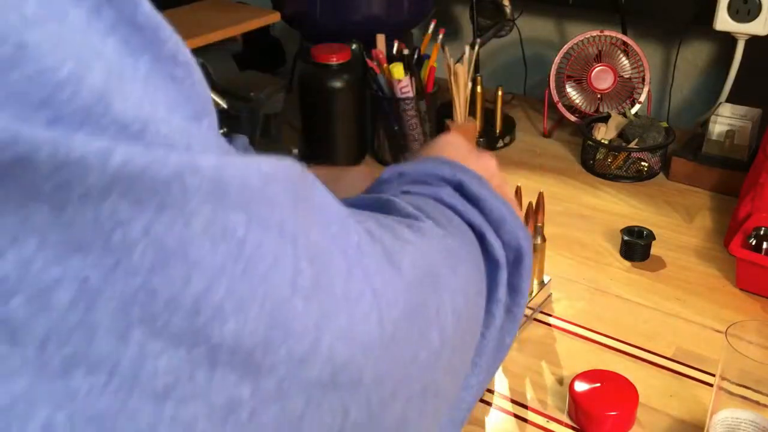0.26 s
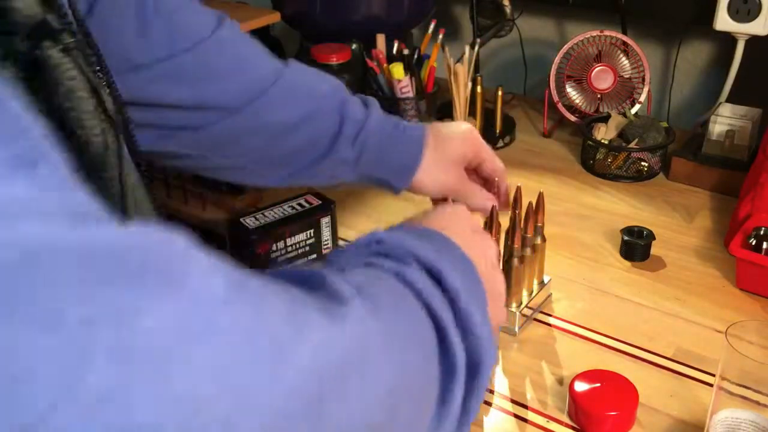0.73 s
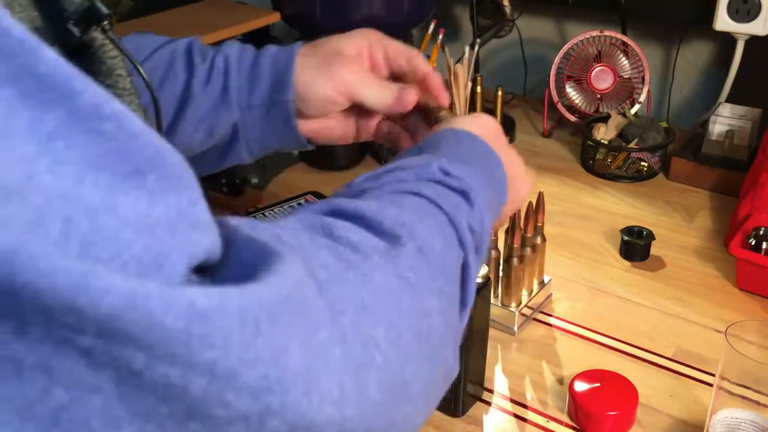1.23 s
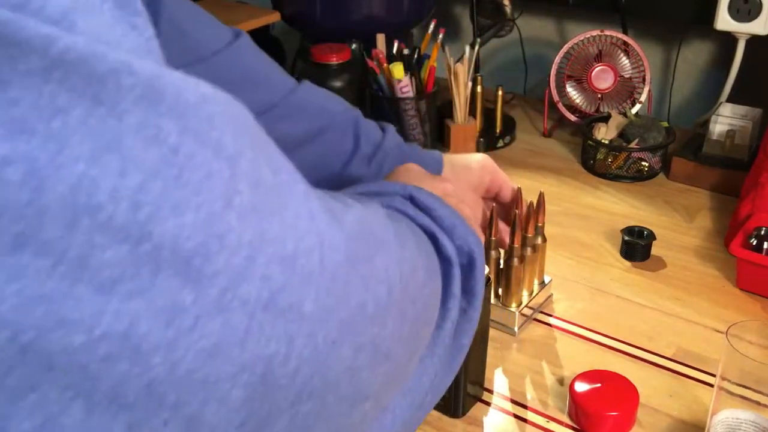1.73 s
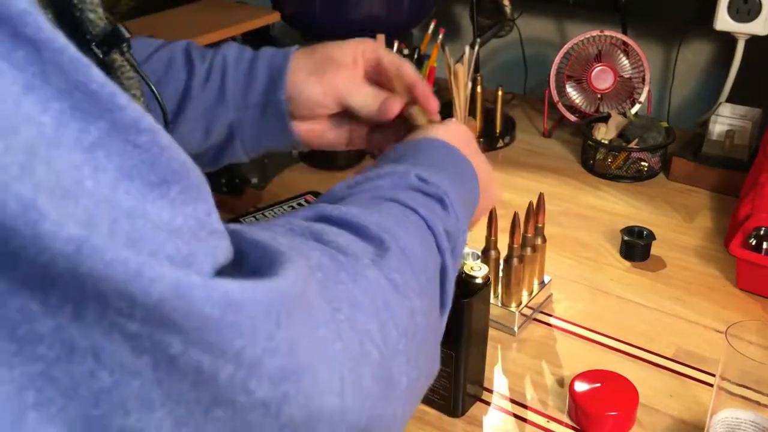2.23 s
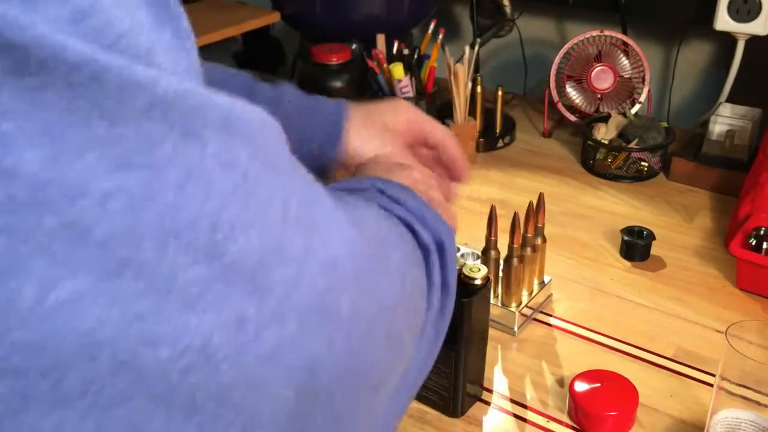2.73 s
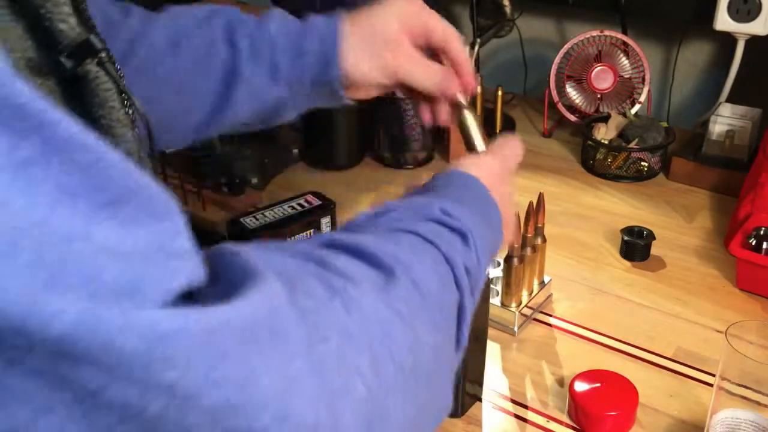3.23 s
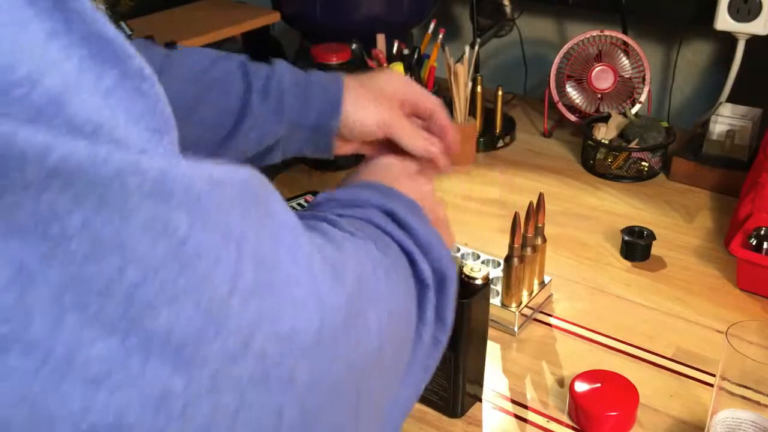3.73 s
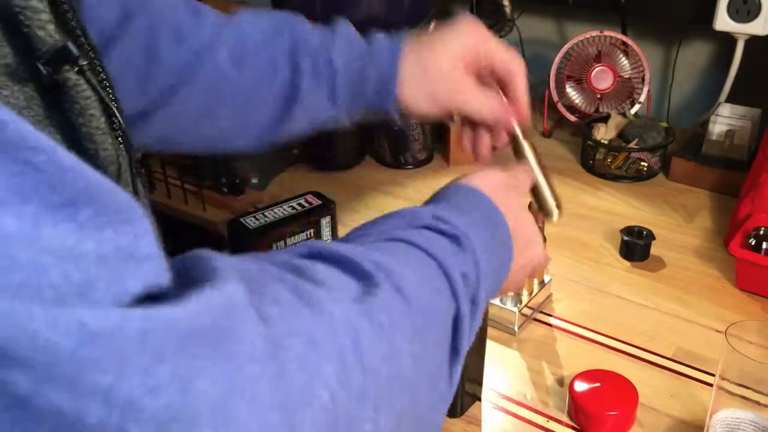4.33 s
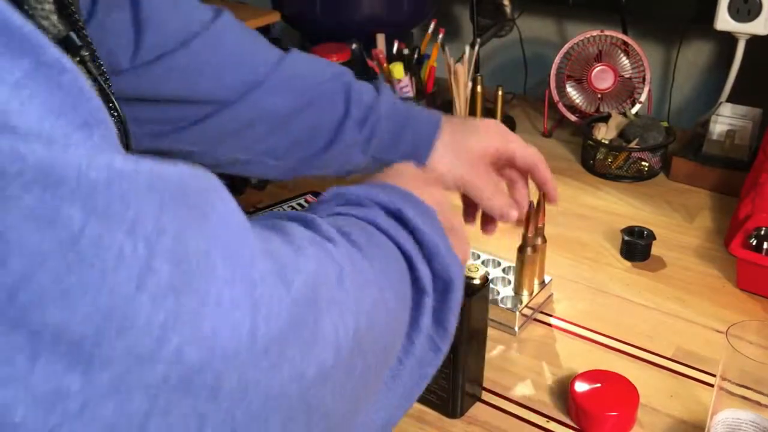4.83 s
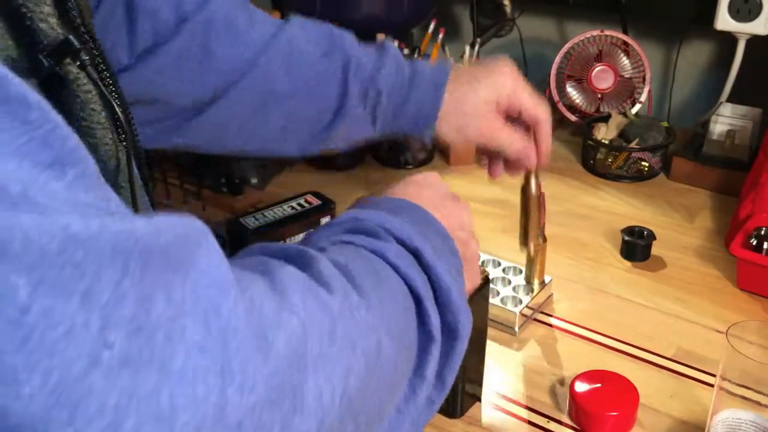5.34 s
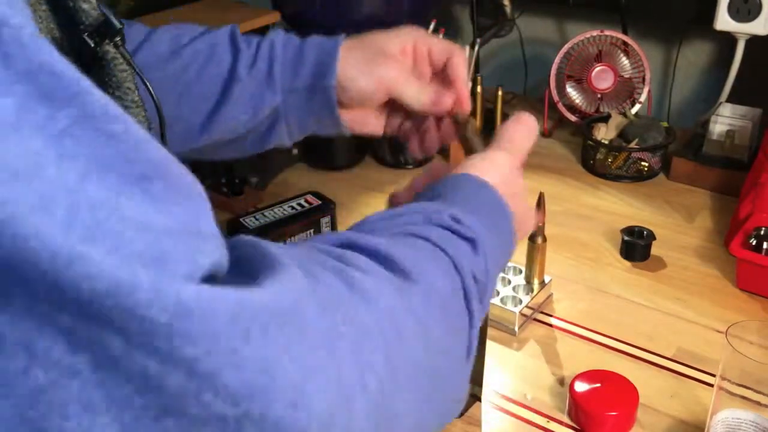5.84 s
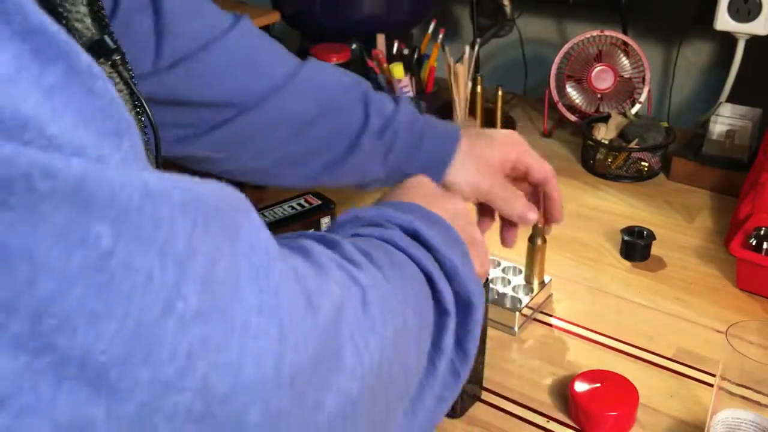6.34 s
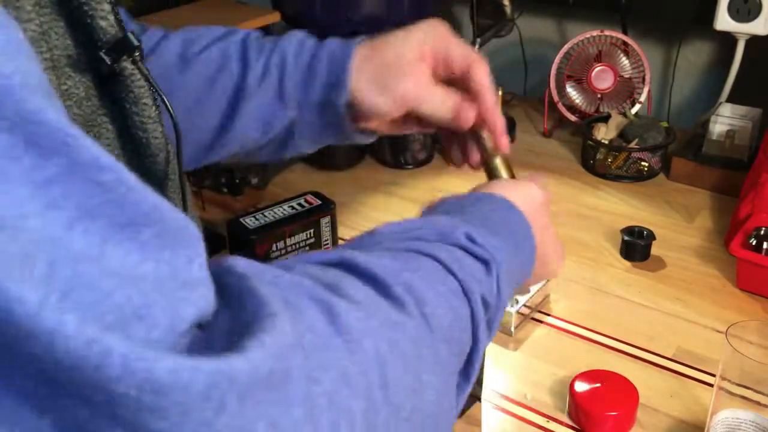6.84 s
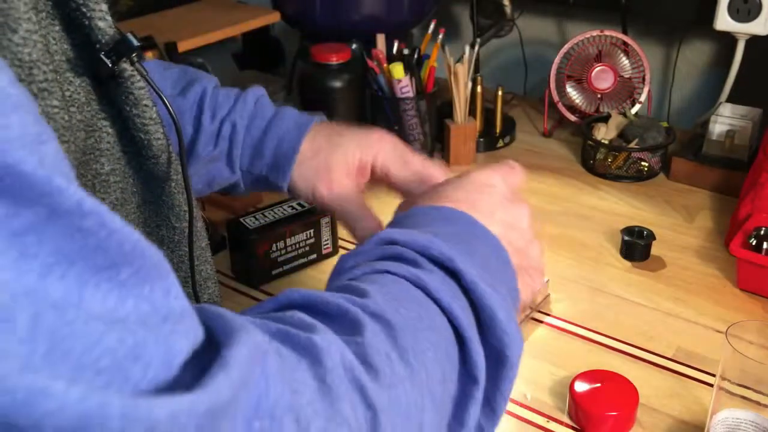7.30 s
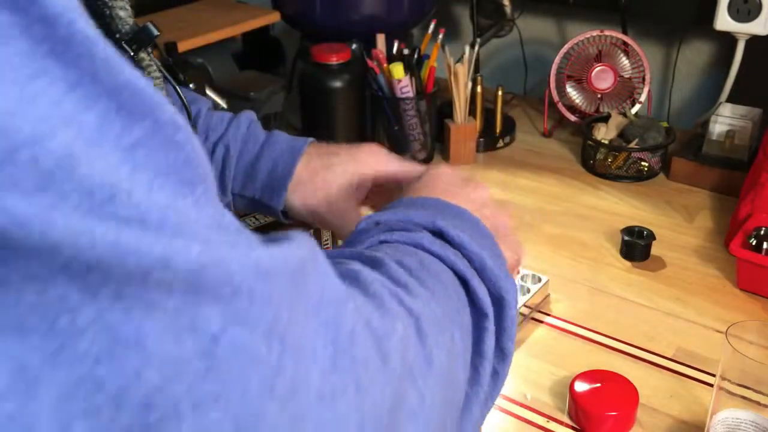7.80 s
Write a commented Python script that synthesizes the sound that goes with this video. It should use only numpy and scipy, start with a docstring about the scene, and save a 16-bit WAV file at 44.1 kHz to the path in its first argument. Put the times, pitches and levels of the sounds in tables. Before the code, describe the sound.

Brass rifle cartridges are loaded one by one into a metal holder on a wooden bench, heard close in a small room with faint electrical hum. A sleeve rustles and brass clinks, then a loud clatter of hollow, briefly ringing knocks comes at 0.6 seconds. Light clinks and dull finger bumps follow around 1 second. More cartridges knock home at 1.9, 2.9 and 4 seconds, each preceded by small taps or clinks; the one at 2.9 is loudest and briefly overloads the microphone. Short scrapes, soft sleeve rubs and a few low puffs of air fall in between. Lighter taps and bumps come around 5 seconds, then further clatters at 5.7, 6.3 and 6.5. From 7.2 seconds a cartridge is lined up with quick taps, chinks and scrapes over rustling cloth, before the last sharp knocks at about 7.9 to 8 seconds.

```python
"""Loading rifle cartridges into a metal block

Cartridges are lifted from a tray and pressed one by one into a block on a wooden bench. Each goes in
with a clatter of knocks that ring the block and its walls; the brass cases clink and sing when handled.
Hands bump and a sleeve rustles in a small room with faint mains hum. Loud knocks overload the mic."""
import sys
import numpy as np
from scipy import signal
from scipy.fft import rfft, irfft, next_fast_len
from scipy.io import wavfile
from scipy.ndimage import uniform_filter1d

SR = 44100
rng = np.random.default_rng(int(sys.argv[2]) if len(sys.argv) > 2 else 0)


def bounce(signal):
    """Save signal as a 16-bit WAV file at the path given by the first command-line argument."""
    frames = np.transpose(np.atleast_2d(signal))
    limited = np.clip(frames, -1, 1)
    pcm = np.round(limited * 32767).astype(np.int16)
    wavfile.write(sys.argv[1], SR, pcm)


N = 355710
AGE_S = np.arange(SR // 3) / SR  # time since a contact

# Noise spectra. Each row: frequency in Hz, relative density in dB.
AIR_SPECTRUM = [(100, -8), (280, -13.5), (460, -16), (680, -16), (1000, -26), (5800, -34), (16000, -42)]
RUMBLE_SPECTRUM = [(5, -1.5), (15, 7.5), (30, -11), (50, -14), (80, -27), (150, -39), (400, -72.5)]
CLOTH_SPECTRUM = [(100, 1), (300, 9.5), (800, 8), (1500, 2), (3500, -1.5), (7000, -15.5), (10000, -26),
                  (16000, -26.5)]
THUD_SPECTRUM = [(40, -15.5), (110, -8), (200, -3.5), (290, 3.5), (450, 3), (650, 1), (900, -4),
                 (6000, -71.5)]
SCUFF_SPECTRUM = [(400, 15.5), (900, 9.5), (1800, 9), (3500, 0.5), (5000, -9.5), (8000, -42), (16000, -103)]
CHINK_SPECTRUM = [(1400, -21.5), (2400, -2), (3150, 7), (3900, -4), (5500, -6.5), (7000, -12.5),
                  (8300, -16), (9800, -26.5), (16000, -33.5)]
WALL_SPECTRUM = [(300, -23.5), (650, -4), (900, 4), (1300, -7), (2000, -7), (2500, -20.5), (12000, -61.5)]
CRACK_SPECTRUM = [(1200, -20), (2400, 1), (3200, 3.5), (4500, -2), (7200, -8), (8300, -14.5),
                  (11000, -20.5), (16000, -33.5)]
TICK_SPECTRUM = [(60, 28.0), (1000, -6.5), (4000, -1), (12000, -30), (16000, -23)]
# Mains hum. Each row: frequency in Hz, rms level in dB.
HUM_PARTIALS = [(120, -57), (360, -66), (600, -67.5), (720, -74.5)]
# Room decay. Each row: frequency in Hz, T60 in seconds.
ROOM_DECAY = [(100, 0.61), (500, 0.27), (1500, 0.31), (4000, 0.25), (7000, 0.3), (10000, 0.08),
              (16000, 0.2)]
# Modes. Each row: frequency in Hz, relative level in dB, T60 in seconds.
BLOCK_MODES = [(277, -27, 0.23), (394, -18, 0.11), (519, -10.5, 0.048), (574.6, -8.5, 0.17),
               (669, -13.5, 0.25), (762, -10.5, 0.061)]
WALL_MODES = [(824, -0.5, 0.12), (930, -8.5, 0.17), (1080, -8, 0.2), (1097, -5, 0.14), (1283, 2, 0.072),
              (1350, -7, 0.091), (1662, -13.5, 0.15), (1697, -3.5, 0.11), (1932, 1.5, 0.08),
              (2104, 2.5, 0.063)]
HELD_CASE_MODES = [(2350, -2.5, .1), (2880, -1.5, 0.089), (3310, -3.5, 0.069), (3920, -8.5, 0.052),
                   (4720, -4.5, 0.056), (5460, -15.5, 0.16), (6300, -6.5, 0.082), (6950, -8.5, 0.097),
                   (7410, -11, 0.15), (9000, -13.5, .07)]
HANGING_CASE_MODES = [(3030, 10, 0.035), (4350, -7, 0.028), (4460, 8.5, 0.046), (6550, -6, 0.044),
                      (6320, -0.5, 0.0363), (9470, -10, 0.16), (10350, -1.5, 0.23), (13160, -11, .14),
                      (13600, -7, .14), (15300, -8, .13)]

# Sleeve rubs. Each row: midpoint in seconds, length in seconds, level in dB.
STROKES = [(0.275, 0.023, -40), (0.338, 0.16, -45), (1.393, 0.67, -61.5), (3.21, 0.15, -45.5),
           (4.335, 0.053, -37.5), (5.34, 0.56, -54.5), (7.8, 0.47, -45)]
# Air pushed by passing arms. Each row: midpoint in seconds, peak in dB.
PUFFS = [(1.272, -30.5), (2.285, -23.5), (3.413, -17.5), (4.548, -29.5)]
# Ticks at the mic. Each row: start in seconds, level in dB.
TICKS = [(2.279, -40.5), (3.36, -30.5), (4.543, -44.5)]
# Fingers on tray and block. Each row: start in seconds, thud in dB, scuff in dB.
BUMPS = [(0.888, -40, -37.5), (0.912, -27.5, -32), (0.951, -24, -39), (1.032, -34, -24),
         (1.108, -31.5, -29.5), (2.002, -51.5, -31.5), (3.07, -53, -32.5), (3.086, -31.5, -40),
         (3.153, -35.5, -33.5), (3.238, -37, -34), (4.237, -29, -34), (5.066, -28.5, -27),
         (5.219, -45.5, -44), (5.294, -36, -43), (5.32, -31.5, -38), (6.591, -26.5, -36)]
# Lining up a cartridge. Each row: start in seconds, length in seconds, base level in dB.
FUMBLES = [(5.015, .03, -35.5), (7.207, .075, -43), (7.332, .04, -46), (7.527, .05, -42.5),
           (7.752, .04, -37)]
# Bullet tip on a wall. Each row: start in seconds, level in dB, block response in dB.
TAPS = [(0.16, -49, -54), (0.26, -49, -44), (0.974, -29.5, -45), (1.801, -25, -23), (2.77, -34, -25),
        (4.09, -36, -31), (4.981, -31.5, -33.5), (4.997, -32.5, -27), (5.05, -37, -29.5),
        (5.586, -35, -38.5), (5.606, -31, -36), (6.404, -31.5, -25), (7.203, -25, -38.5),
        (7.391, -38.5, -47), (7.418, -30, -26), (7.442, -34, -31.5), (7.463, -41, -51), (7.661, -29.5, -29),
        (7.739, -25, -33), (7.844, -27, -29.5)]
# Case dragged on the block. Each row: start in seconds, length in seconds, level in dB.
SCRAPES = [(0.443, 0.055, -47), (1.907, 0.13, -39.5), (6.384, 0.15, -45), (7.588, 0.068, -47.5),
           (7.718, 0.068, -41.5)]
# Case along the tray. Each row: start and length in seconds, then low, middle and high modes in dB.
SLIDES = [(1.998, .035, -40, -43, -66), (3.173, .033, -45, -52.5, -63), (4.323, 0.032, -50.5, -46.5, -57),
          (5.303, 0.017, -48.5, -44.5, -76), (5.375, 0.021, -50, -52, -74), (6.6, 0.062, -37, -49.5, -71)]
# Rim past an edge. Each row: start in seconds, level in dB, resonance in Hz.
SNAPS = [(0.447, -37, 6650), (.643, -22, 4450), (1.003, -34.5, 7150), (1.031, -36.5, 11100),
         (1.102, -43, 7100), (3.219, -31.5, 5430), (3.217, -41, 10400), (3.989, -29.5, 6600),
         (4.003, -28.5, 6250), (6.2717, -30, 5800), (7.918, -27, 7000)]
# Brass on brass. Each row: start in seconds, level in dB, block response in dB, main ring in Hz.
CLINKS = [(0.435, -35, -23, 3110), (0.448, -32.5, -29, 3160), (0.485, -33, -32, 3120),
          (0.493, -30, -49.5, 3160), (1.003, -31, -49, 3410), (1.034, -25, -49, 3090),
          (1.102, -28.5, -48, 3070), (1.653, -37.5, -45, 3110), (1.667, -38.5, -43, 3130),
          (2.67, -30.5, -28, 7500), (2.689, -29, -24.5, 7400), (3.218, -30, -41, 5500),
          (5.45, -41, -45.5, 3060), (6.433, -29.5, -26.5, 2914), (7.261, -35, -39, 2945),
          (7.752, -27, -29, 3560)]
# Cartridge catching at the block's mouth, then seating. Each row: start in seconds, strength in dB,
# hardness in dB (high edge-on, low flat), centre of the wall ring in Hz.
KNOCKS = [(0.549, -22.5, 1.5, 1120), (0.6137, -12, -7.5, 1140), (0.6164, -16.5, 10, 1280),
          (0.635, -5.5, -29, 1110), (0.643, -1.5, -7, 1030), (1.774, -20.5, -5.5, 905),
          (1.864, -10.5, -3.5, 1130), (1.872, -9, -2, 1130), (1.879, -7, -7, 1060),
          (1.898, -3.5, -2.5, 960), (2.846, -23.5, 10.5, 920), (2.8504, -1, -7.5, 1020),
          (2.866, 5.5, -11.5, 1200), (2.888, -13.5, -1, 1200), (3.846, -22.5, 0, 1100),
          (3.967, -19.5, 1, 980), (3.981, -10.5, 0, 1170), (3.999, -4.5, -4, 1148), (5.074, -21, -3, 1180),
          (5.642, -15, -2.5, 890), (5.654, -12, -1.5, 990), (5.667, -14, -7, 885), (5.682, -5, -6, 1360),
          (6.258, -8.5, -5, 944), (6.456, -19.5, -2.5, 965), (6.485, -12, -3, 1090),
          (7.886, -11.5, -1, 1380), (7.907, -6.5, -8, 1400), (7.918, -6.5, -6.5, 1450),
          (7.997, -7.5, -3, 1310)]

GRAIN_DB, SCRAPE_T60_S = 5.5, 0.08
EMPTY_HZ, FULL_HZ, FILL_TAU_S = 684, 549, 3.2  # the block's note sinks as it fills
CRACK_DB, CRACK_DB_PER_DB = -9, 1.257  # the crack grows faster than the ring
REBOUND_GAP_S, REBOUND_DB, REBOUND_CRACK_DB = 0.007, -11.5, 6.5  # per rebound


def amp(db):
    """Decibels to gain."""
    return 10 ** (np.asarray(db) / 20)


def unit_rms(x):
    """Scale to rms 1."""
    return x / np.sqrt(np.mean(x ** 2) + 1e-20)


def unit_attack(x):
    """Scale to rms 1 over the first 8 ms."""
    return x / np.sqrt(np.mean(x[:353] ** 2) + 1e-20)


def log_interp(points, hz):
    """Read a table on a log-frequency axis."""
    points_hz, values = np.transpose(points)
    return np.interp(np.log(hz + 1), np.log(points_hz + 1), values)


def add(mix, start_s, sound):
    """Mix a sound in, in place."""
    part = mix[round(start_s * SR):][:len(sound)]
    part += sound[:len(part)]


def colour(x, spectrum):
    """Minimum-phase filter with the given spectrum."""
    size = next_fast_len(len(x) + 4096)
    log_gain = np.log(amp(log_interp(spectrum, abs(np.fft.fftfreq(size, 1 / SR)))))
    response = np.exp(np.conj(signal.hilbert(log_gain)))[:size // 2 + 1]
    return irfft(rfft(x, size) * response, size)[:len(x)]


def decay(t60_s):
    """Exponential envelope."""
    return amp(-60 * AGE_S / t60_s)


def grit():
    """Micro-impacts of uneven size."""
    noise, grain = rng.standard_normal((2, len(AGE_S)))
    return noise * amp(GRAIN_DB * np.clip(grain, -2, 2))


def burst(spectrum, t60_s, scrape_db=-np.inf):
    """A contact: dense micro-impacts, then a scrape if the metal slides on."""
    envelope = decay(t60_s) + amp(scrape_db) * decay(SCRAPE_T60_S)
    return unit_attack(colour(grit() * envelope, spectrum))


def ring(modes, scatter_db, detune):
    """Decaying modes; contact point and grip vary their levels and pitches."""
    hz, db, t60_s = np.transpose(modes)[:, :, None]
    strength, shift, side = rng.standard_normal((3, len(modes), 1))
    waves = np.sign(side) * np.sin(2 * np.pi * hz * (1 + detune * shift) * AGE_S)
    return unit_attack((amp(db + scatter_db * strength) * decay(t60_s) * waves).sum(0))


def friction(response, length_s):
    """A stream of micro-impacts drives a body, which rings on."""
    contact = np.clip(np.minimum(AGE_S, length_s - AGE_S) / 0.0051, 0, 1)
    sound = signal.fftconvolve(grit() * contact, response)[:len(AGE_S)]
    return sound / np.sqrt(np.sum(sound ** 2) / (SR * length_s))


def background():
    """Room air, mains hum, and a lumpy rumble of moving air and bench."""
    t = np.arange(N) / SR
    air_noise, rumble_noise, lumps = rng.standard_normal((3, N))
    swell = amp(3.5 * unit_rms(uniform_filter1d(lumps, size=9000)))
    air = unit_rms(colour(air_noise, AIR_SPECTRUM))
    rumble = unit_rms(colour(rumble_noise * swell, RUMBLE_SPECTRUM))
    hum = sum(amp(db) * np.sqrt(2) * np.sin(2 * np.pi * (hz * t + rng.random()))
              for hz, db in HUM_PARTIALS)
    return amp(-57) * air + amp(-38.5) * rumble + hum


def room(x, wet_db):
    """Add sparse reflections, each band decaying at its own rate."""
    echoes = rng.choice([-1., 1.], SR // 2) * (rng.random(SR // 2) < 0.12)
    echoes[:SR // 200] = 0  # 5 ms pre-delay
    hz, t, bands = signal.stft(echoes, SR, nperseg=256)
    bands = bands * amp(-60 * t / log_interp(ROOM_DECAY, hz)[:, None])
    tail = signal.istft(bands, SR, nperseg=256)[1]
    return x + amp(wet_db) * signal.fftconvolve(x, tail / np.linalg.norm(tail))[:N]


def sleeve():
    """Fleece rubbing: grainy noise swells with each stroke; puffs of air dip the pressure."""
    t = np.arange(N) / SR
    noise, grain = rng.standard_normal((2, N))
    catches = amp(1.5 * unit_rms(uniform_filter1d(grain, size=300)))
    speed = sum(amp(db) * np.exp(-(2 * (t - mid_s) / length_s) ** 2) for mid_s, length_s, db in STROKES)
    puffs = sum(amp(db) * np.exp(-((t - mid_s) / 0.009) ** 2) for mid_s, db in PUFFS)
    return speed * unit_rms(colour(noise * catches, CLOTH_SPECTRUM)) - puffs


def ticks():
    """Tiny snaps, too close to carry any room."""
    out = np.zeros(N)
    for start_s, db in TICKS:
        add(out, start_s, amp(db) * burst(TICK_SPECTRUM, t60_s=0.0084))
    return out


def finger_bumps():
    """Soft fingers give a dull thud and a scuff."""
    out = np.zeros(N)
    for start_s, thud_db, scuff_db in BUMPS:
        add(out, start_s, amp(thud_db) * burst(THUD_SPECTRUM, t60_s=0.17))
        add(out, start_s, amp(scuff_db) * burst(SCUFF_SPECTRUM, t60_s=0.12))
    return out


def walls(centre_hz, width_oct, noise_db):
    """The thin walls ring most near centre_hz, set by where they are hit."""
    def focus_db(hz):
        return -3 * (np.log2(hz / centre_hz) / width_oct) ** 2
    modes = [(hz, db + focus_db(hz), t60_s) for hz, db, t60_s in WALL_MODES]
    spectrum = [(hz, db + focus_db(hz)) for hz, db in WALL_SPECTRUM]
    tones = ring(modes, scatter_db=4.5, detune=0.012)
    return unit_attack(tones + amp(noise_db) * burst(spectrum, t60_s=0.019, scrape_db=-8))


def touched_block():
    """The block's damped response to a light contact."""
    body = unit_attack(ring(BLOCK_MODES, scatter_db=4, detune=0.035) * decay(0.13))
    return body + amp(-8.5) * walls(centre_hz=798, width_oct=0.34, noise_db=-1.5)


def touched_wall():
    """A light contact briefly stirs the upper wall modes."""
    return walls(centre_hz=1620, width_oct=0.55, noise_db=5) * decay(0.098)


def chink(scrape_db=-13):
    """Bright click of brass, without its ring."""
    return burst(CHINK_SPECTRUM, t60_s=0.018, scrape_db=scrape_db)


def fumbles(gap_s=0.014, spread_db=8):
    """Small chinks at uneven gaps while a cartridge is lined up."""
    out = np.zeros(N)
    for start_s, length_s, db in FUMBLES:
        for k, (jitter, size) in enumerate(rng.random(size=(12, 2))):
            delay_s = (k + jitter) * gap_s
            contact = chink() + amp(5.5) * touched_wall()
            if delay_s < length_s:
                add(out, start_s + delay_s, amp(db + spread_db * (2 * size - 2.5)) * contact)
    return out


def tip_taps():
    """A bullet tip on a wall: a short knock and a chink."""
    out = np.zeros(N)
    for start_s, db, block_db in TAPS:
        tap = touched_wall() + amp(-9.5) * chink()
        add(out, start_s, amp(db) * tap + amp(block_db) * touched_block())
    return out


def block_scrapes():
    """Dragged brass stirs the block's main notes, upper wall modes and lower case modes."""
    out = np.zeros(N)
    modes = BLOCK_MODES[3:5] + WALL_MODES[6:] + HELD_CASE_MODES[:4]
    for start_s, length_s, db in SCRAPES:
        body = ring(modes, scatter_db=3.5, detune=0.016) * decay(0.08)
        add(out, start_s, amp(db) * friction(body, length_s))
    return out


def tray_slides():
    """The rim rasps on the tray and the hanging case sings; fingers damp its modes unevenly."""
    out = np.zeros(N)
    groups = HANGING_CASE_MODES[:1], HANGING_CASE_MODES[1:5], HANGING_CASE_MODES[5:]
    for start_s, length_s, low_db, mid_db, high_db in SLIDES:
        for modes, db in zip(groups, (low_db, mid_db, high_db)):
            case = ring(modes, scatter_db=6, detune=0.0009)
            add(out, start_s, amp(db) * friction(case, length_s))
        rasp = friction(burst(CHINK_SPECTRUM, t60_s=0.0011), length_s)
        add(out, start_s, amp(mid_db + 1.5) * rasp)
    return out


def rim_snaps(q=4.8):
    """A rim slips past an edge: a short, bright contact with one broad resonance."""
    out = np.zeros(N)
    grid_hz = np.geomspace(100, SR / 2, 120)
    for start_s, db, hz in SNAPS:
        band_db = -20 * np.log10(1 + (q * (grid_hz / hz - hz / grid_hz)) ** 2)
        spectrum = np.column_stack([grid_hz, band_db])
        add(out, start_s, amp(db) * burst(spectrum, t60_s=0.062, scrape_db=-19))
    return out


def case_clinks(ring_cycles=235, pair_ratio=0.82):
    """Brass meets brass: a close pair of modes set by the grip rings, and the block responds."""
    out = np.zeros(N)
    for start_s, db, block_db, hz in CLINKS:
        t60_s = ring_cycles / hz
        pair = ring([(hz, 0, t60_s), (hz * pair_ratio, -5, t60_s / 2)], scatter_db=0, detune=0.003)
        pair *= 3600 / hz  # a soft touch favours low modes
        others = ring(HELD_CASE_MODES, scatter_db=3, detune=0.015) * decay(0.2)
        brass = unit_attack(pair + amp(-3) * others + amp(4) * chink(scrape_db=-14))
        clink = brass + amp(-7) * touched_wall()
        add(out, start_s, amp(db) * clink + amp(block_db) * touched_block())
    return out


def seating_knocks():
    """Heavy blows: the block's damped note, a bench thud, then wall ring and crack as the case chatters."""
    out = np.zeros(N)
    for start_s, strength_db, hardness_db, centre_hz in KNOCKS:
        note_hz = FULL_HZ + (EMPTY_HZ - FULL_HZ) * np.exp(-start_s / FILL_TAU_S)
        note = unit_attack(-np.sin(2 * np.pi * note_hz * AGE_S) * decay(0.075))
        body = ring(BLOCK_MODES, scatter_db=1, detune=0.025)
        bench = body + amp(-6.5) * burst(THUD_SPECTRUM, t60_s=0.11)
        bench_db = min(strength_db, -10) - 4  # levels off in the hardest blows
        add(out, start_s, amp(strength_db - 4) * note + amp(bench_db) * bench)
        gaps_s = REBOUND_GAP_S * (0.5 + rng.random(3))
        for k, delay_s in enumerate(np.cumsum(gaps_s) - gaps_s[0]):  # blow, then two rebounds
            wall_db = strength_db + hardness_db + k * REBOUND_DB
            crack_db = CRACK_DB + CRACK_DB_PER_DB * wall_db + k * REBOUND_CRACK_DB
            case = ring(HELD_CASE_MODES, scatter_db=3, detune=0.02)
            crack = burst(CRACK_SPECTRUM, t60_s=0.04, scrape_db=-4) + amp(-13) * case
            wall = walls(centre_hz, width_oct=0.55, noise_db=5.5)
            add(out, start_s + delay_s, amp(wall_db) * wall + amp(crack_db) * crack)
    return out


def scene():
    """Bench work in the room, plus dry ticks, sleeve and background; mono."""
    handling = case_clinks() + rim_snaps() + tray_slides() + block_scrapes() + finger_bumps()
    aligning = tip_taps() + fumbles()
    knocks = room(seating_knocks(), wet_db=-15)
    bench = knocks + room(handling, wet_db=-11.5) + room(aligning, wet_db=-11.5)
    return (bench + ticks() + sleeve() + background())[None]


def record(dry):
    """Mic overload at full scale, then a 16.2 kHz low-pass."""
    clipped = dry / (1 + dry ** 8) ** (1 / 8)
    lowpass = signal.firwin(511, 16200, window=("kaiser", 9), fs=SR)
    return signal.oaconvolve(clipped, lowpass[None], "same")


dry = scene()
out = record(dry)
bounce(out)
```